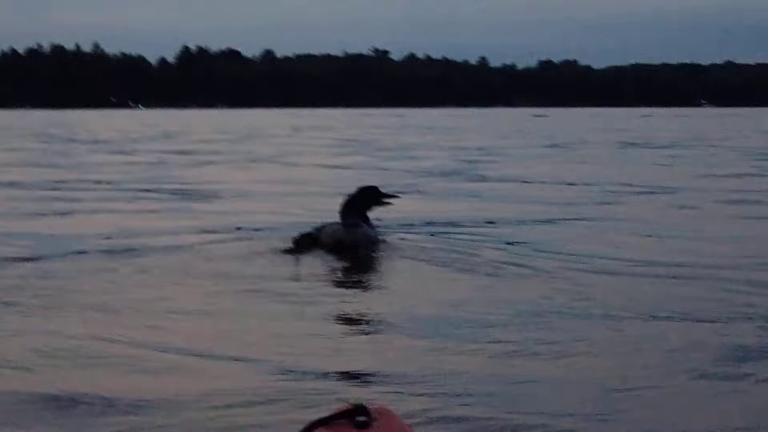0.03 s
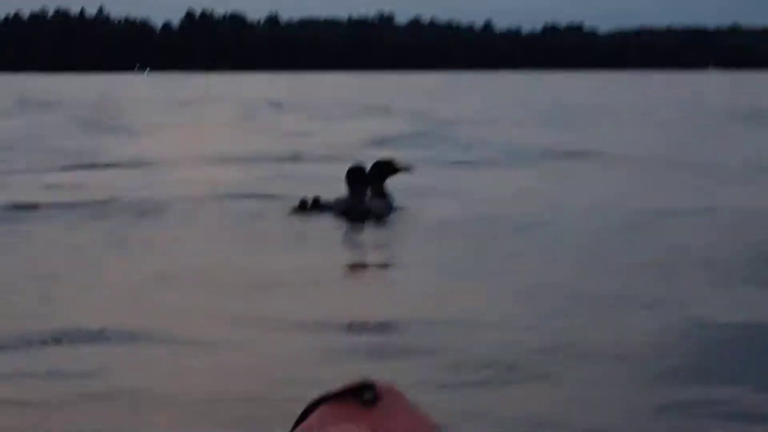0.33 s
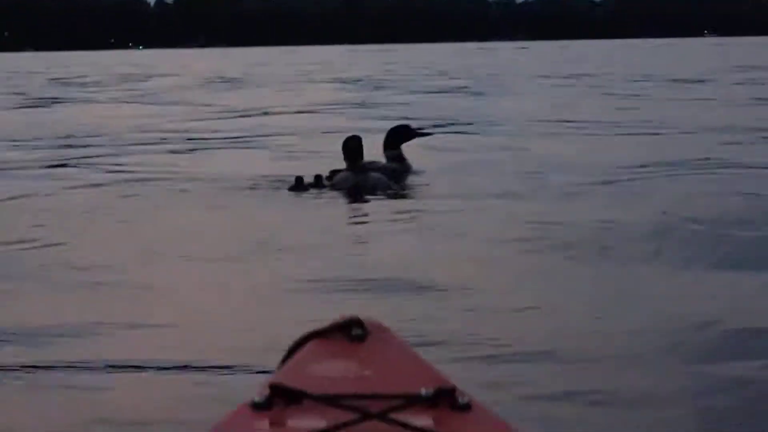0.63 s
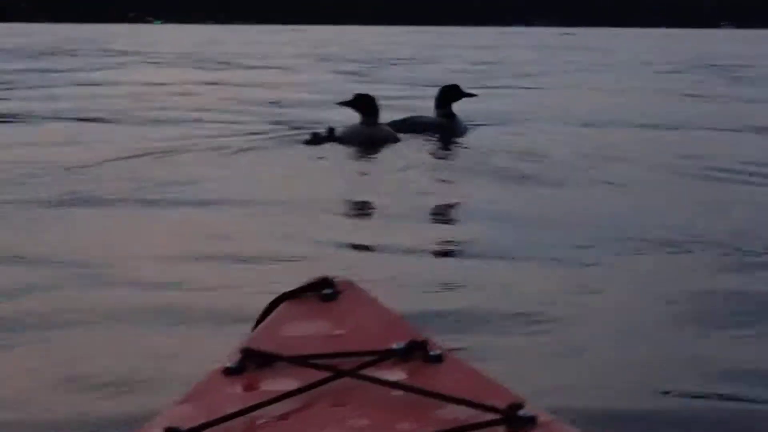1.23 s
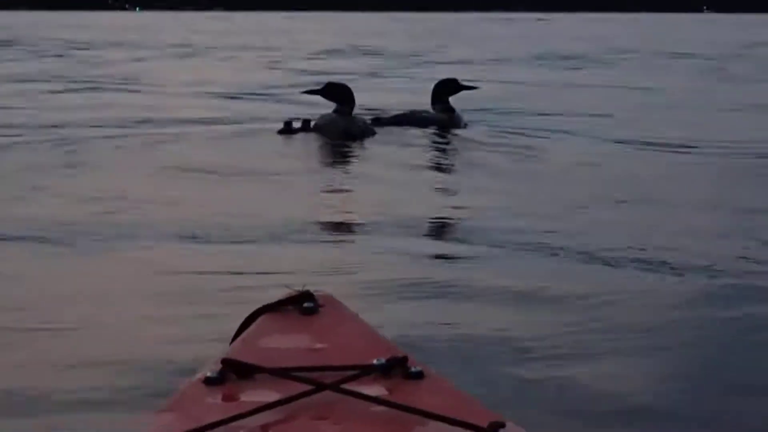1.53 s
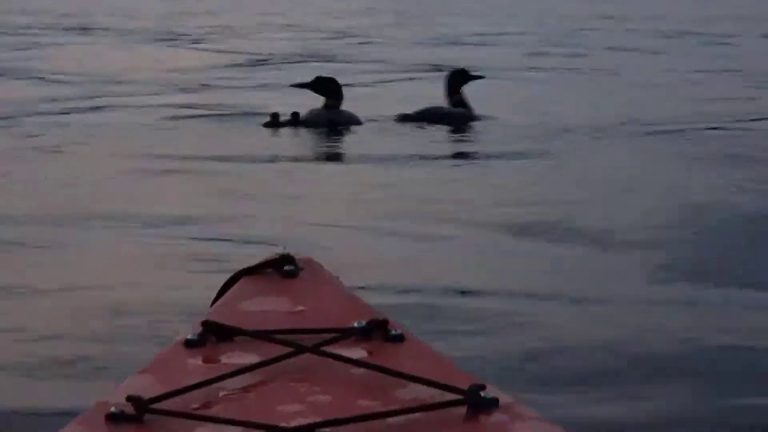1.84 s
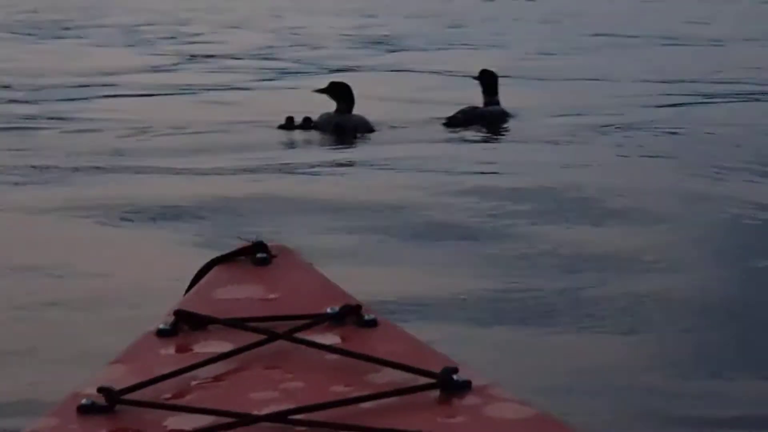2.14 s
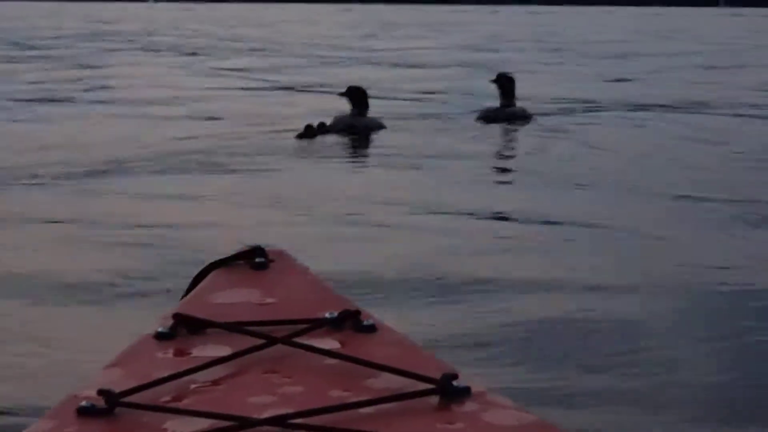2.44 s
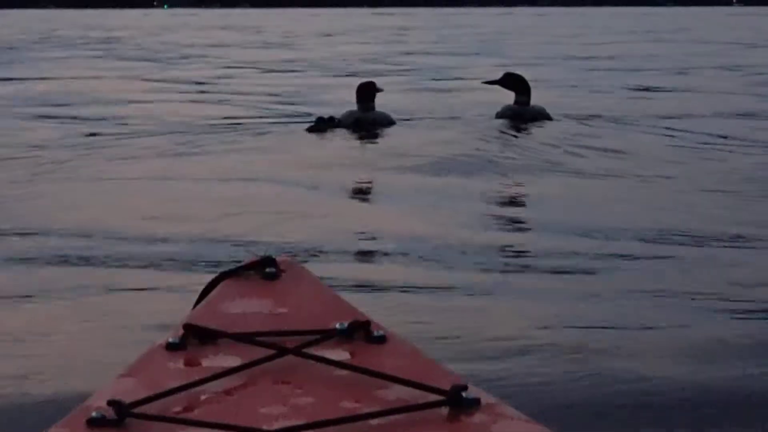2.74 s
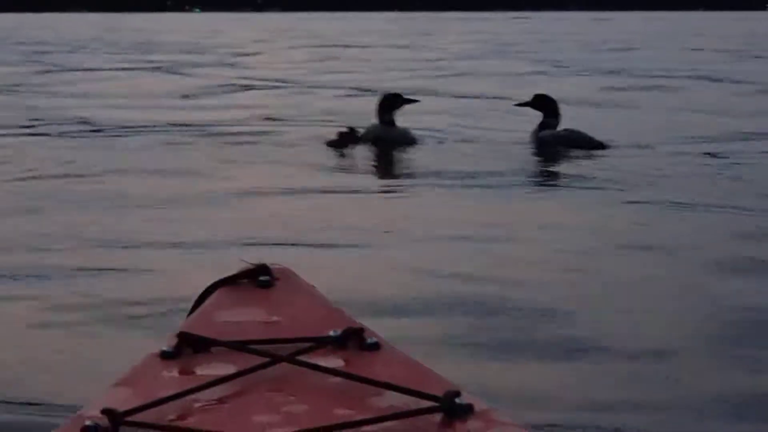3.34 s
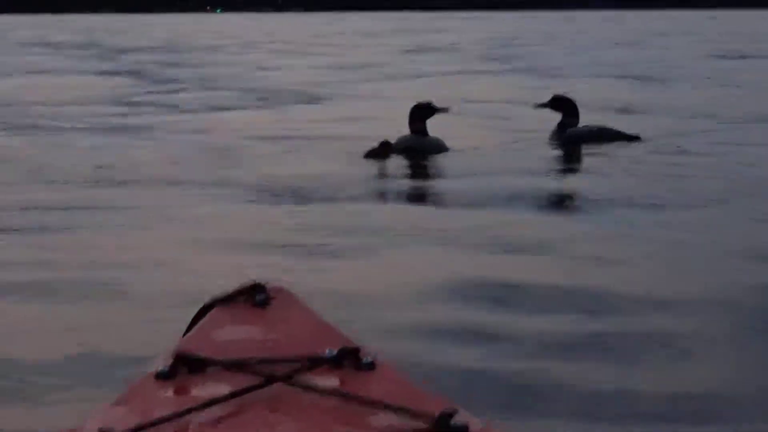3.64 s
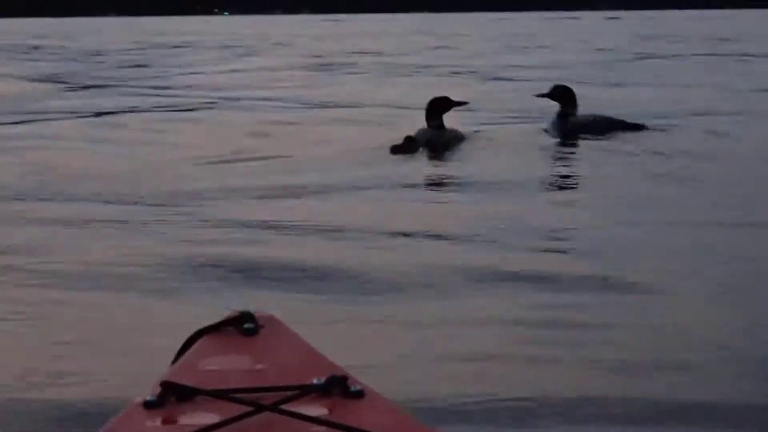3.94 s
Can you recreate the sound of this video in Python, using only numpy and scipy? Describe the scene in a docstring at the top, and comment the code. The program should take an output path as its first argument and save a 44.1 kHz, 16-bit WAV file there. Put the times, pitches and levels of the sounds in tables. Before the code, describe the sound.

A faint, even wash of open air and hiss, dotted with small taps on a kayak.

```python
"""Kayak on a lake at dusk

The microphone opens with two soft pops onto a distant wash, a faint drone and its own hiss.
Clusters of small contacts bump the drifting hull, and two quick knocks ring the deck.
The hand-held camera ticks; something in it, probably the lens motor, whines faintly in short steps."""
import sys
import numpy as np
from scipy import signal
from scipy.fft import rfft, irfft
from scipy.io import wavfile
from scipy.ndimage import uniform_filter1d

SR = 44100
rng = np.random.default_rng(int(sys.argv[2]) if len(sys.argv) > 2 else 0)


def generate_wav(sig):
    """Save sig (samples, or channels by samples) to the path in sys.argv[1] as 16-bit PCM at SR."""
    pcm = np.round(np.clip(np.atleast_2d(sig).T, -1, 1) * 32767).astype(np.int16)
    wavfile.write(sys.argv[1], SR, pcm)


N = 176400


def from_db(db):
    """Decibels to gain."""
    return 10 ** (np.asarray(db) / 20)


def unit_rms(x):
    """Scale to unit power."""
    return x / np.sqrt(np.mean(x ** 2) + 1e-20)


def clock():
    """Sample times [s]."""
    return np.arange(N) / SR


def pan(db):
    """Stereo gains for a left-minus-right level."""
    return from_db(np.array([[db], [-db]]) / 2)


def colour(points):
    """Gain per FFT bin from (frequency [Hz], level [dB]) points."""
    hz, db = np.transpose(points)
    bin_hz = np.arange(N // 2 + 1) * SR / N
    return from_db(np.interp(np.log(bin_hz + 1e-9), np.log(hz), db))


def noise(gains):
    """White noise shaped by a gain per FFT bin."""
    return irfft(rfft(rng.standard_normal(N)) * gains, N)


def stereo_noise(points):
    """Independent left and right noise, unit RMS."""
    return unit_rms(np.array([noise(colour(points)) for _ in range(2)]))


def drift(corner_hz):
    """Slow random motion, unit RMS."""
    bin_hz = np.arange(N // 2 + 1) * SR / N
    return unit_rms(noise(1 / (1 + (bin_hz / corner_hz) ** 2)))


def click(at_s):
    """Unit impulse."""
    return 1.0 * (np.arange(N) == int(at_s * SR))


def butter(x, order, hz, kind="low"):
    """Butterworth filter."""
    return signal.sosfilt(signal.butter(order, hz, kind, fs=SR, output="sos"), x + 1e-18)


def ring(force, hz, t60_s):
    """One mode: each impulse starts a decaying sine."""
    radius, angle = from_db(-60 / (t60_s * SR)), 2 * np.pi * hz / SR
    return signal.lfilter([0, np.sin(angle)], [1, -2 * radius * np.cos(angle), radius ** 2], force + 1e-18)


def strike(force, modes):
    """A force rings a body's modes, alternating in sign."""
    return sum((-1) ** k * from_db(db) * ring(force, hz, t60_s) for k, (hz, db, t60_s) in enumerate(modes))


def wash():
    """Soft, fluttering noise from the far shore, nearly the same in both ears."""
    # (frequency [Hz], relative density [dB])
    spectrum = [(20, -45), (40, -13.5), (70, -11.5), (105, -5), (140, -4), (200, -2), (260, 5), (350, -2),
                (600, -2), (1000, -7), (1400, -12.5), (1780, -16), (1890, -22.5), (2070, -17),
                (2600, -31.5), (3200, -28), (3450, -35), (3650, -26.5), (3950, -39.5), (4300, -31),
                (5050, -17.5), (5900, -27), (9000, -39.5)]
    # (frequency [Hz], side re mid [dB])
    width = [(25, 4), (60, -5.5), (130, -19), (280, -17), (600, -16.5), (1400, -10), (2600, -8.5),
             (4000, -31), (5000, -21)]
    # (time [s], level [dB])
    levels = [(.25, -45), (.6, -45), (1.3, -44.5), (2.05, -45.5), (2.7, -44.5), (3.0, -44), (3.65, -42.5),
              (4, -44.5)]
    mid = noise(colour(spectrum))
    side = noise(colour(spectrum) * colour(width))
    flutter_db = .89 * drift(corner_hz=7.2)
    level_db = np.interp(clock(), *np.transpose(levels)) + flutter_db
    return from_db(level_db) * unit_rms(np.array([mid + side, mid - side]))


def far_tone(hz):
    """A tone that wanders and wavers on its way over the water."""
    wander_hz = 2 * drift(corner_hz=7.6)
    waver_db = 1.5 * drift(corner_hz=5.4)
    phase = 2 * np.pi * np.cumsum(hz + wander_hz) / SR
    return unit_rms(np.sin(phase) * from_db(waver_db))


def drone():
    """Steady far tones, plus whines that swell and fade, perhaps from a road."""
    # (frequency [Hz], level [dB])
    tones = [(96, -60), (261, -53.5), (481, -64), (558, -63.5), (1811, -70)]
    # (peak time [s], 1/e half-width [s], frequency [Hz], glide [Hz/s], level [dB])
    swells = [(3.47, .45, 315, 42, -45), (3.14, .17, 481, 0, -49.5), (3.63, .18, 557, 0, -45.5),
              (3.69, .045, 908, 0, -52.5)]
    out = sum(from_db(db) * far_tone(hz) for hz, db in tones)
    for peak_s, half_s, hz, glide_hz_per_s, db in swells:
        offset_s = clock() - peak_s
        envelope = np.exp(-(offset_s / half_s) ** 2)
        out += from_db(db) * envelope * far_tone(hz + glide_hz_per_s * offset_s)
    return out


def air():
    """Faint rumble of moving air, separate at each microphone port."""
    # (frequency [Hz], relative density [dB])
    spectrum = [(15, 0), (35, -10), (70, -2), (130, -2), (300, -10), (1000, -46)]
    return from_db(-67.5) * stereo_noise(spectrum)


def hiss():
    """Each microphone's steady self-noise."""
    # (frequency [Hz], relative density [dB])
    spectrum = [(2000, -32), (3100, -5.5), (3500, -31), (4200, -31), (4600, -2.5), (5200, -1), (6000, -1.5),
                (6900, -2.5), (8050, 3.5), (9200, -4.5), (11500, -5.5), (16000, -7.5)]
    return from_db(-53.5) * pan(1.8) * stereo_noise(spectrum)


def pops():
    """Two switch-on voltage steps, each swinging back through the microphone's bass cut."""
    # (time [s], level before filtering [dB])
    steps = [(0.2394, -24), (0.2496, -25)]
    rise_s, fall_s = .00041, .0023
    voltage = 0
    for at_s, db in steps:
        age_s = np.maximum(clock() - at_s, 0)
        voltage -= from_db(db) * np.minimum(age_s / rise_s, 1) * np.exp(-age_s / fall_s)
    return butter(voltage, order=2, hz=[53, 1600], kind="band")


def lens_motor():
    """Ticking steps on a steady clock: a high whine in the listed runs, mostly a low one between."""
    # (start [s], length [steps])
    high_runs = [(1.073, 1), (1.173, 2), (1.373, 1), (1.473, 1), (1.64, 2), (1.84, 2), (2.04, 2),
                 (2.173, 1), (2.34, 1), (2.44, 2), (2.64, 1), (2.74, 1), (2.84, 2), (3.04, 1), (3.207, 1),
                 (3.44, 2), (3.573, 2), (3.74, 1), (3.907, 1)]
    steps_per_s, first_s, whine_s = 30, .0065, .027
    high_hz, high_db, high_edge_s = 6150, -51.5, .003
    low_hz, low_db, low_edge_s = 4753, -52, .012
    low_share, spread_hz = .7, 12
    step, age_s = np.divmod(clock() - first_s + 1 / steps_per_s, 1 / steps_per_s)
    step = step.astype(int)
    chance, strength, detune, start_cycles = rng.random((step[-1] + 1, 4))[step].T
    high_steps = [round((at_s - first_s) * steps_per_s) + 1 + k
                  for at_s, count in high_runs for k in range(int(count))]
    is_high = np.isin(step, high_steps)
    is_low = ~is_high & (chance < low_share)
    to_edge_s = np.minimum(age_s, whine_s - age_s)
    cycles = start_cycles + spread_hz * (2 * detune - 1) * age_s
    cycles = cycles + np.array([[0], [.25]])   # right leads by 90 degrees

    def whine(hz, db, edge_s):
        envelope = np.clip(to_edge_s / edge_s, 0, 1)
        return from_db(db) * envelope * np.sin(2 * np.pi * (hz * age_s + cycles))

    high = is_high * whine(high_hz, high_db, high_edge_s)
    low = is_low * whine(low_hz, low_db, low_edge_s)
    kicks = np.diff(step, prepend=0) * (.5 + strength) * np.sign(start_cycles - .5)
    return high + low + from_db(-57) * ring(kicks, hz=3127, t60_s=.016)


def hull_bumps():
    """Each bump is a short cluster of contacts through one broad hull resonance."""
    # (time [s], level [dB], centre [Hz], width [octaves], length [s])
    bumps = [(.508, -35, 247, 0.28, 0.034), (.509, -37.5, 405, 0.3, 0.03), (0.567, -41, 256, .7, 0.011),
             (.627, -40, 1130, 0.56, 0.012), (0.629, -43, 336, 0.98, 0.024),
             (0.666, -48, 1200, 0.64, 0.019), (0.904, -38, 820, 0.67, 0.026), (0.92, -40, 330, 1.73, 0.012),
             (2.942, -43, 293, 0.71, .03), (3.343, -41.5, 1360, .75, 0.015),
             (3.368, -47.5, 1540, 0.43, 0.014)]
    attack_s, release_s, contacts_per_s = .0015, .0076, 900
    out = 0
    for at_s, db, centre_hz, octaves, length_s in bumps:
        age_s = clock() - at_s
        envelope = np.clip(age_s / attack_s, 0, 1) * np.exp(-np.maximum(age_s - length_s, 0) / release_s)
        contacts = (rng.random(N) < contacts_per_s / SR) * rng.choice([-1, 1], N)
        edges_hz = centre_hz * 2 ** (np.array([-.5, .5]) * octaves)
        hull = butter(contacts, order=4, hz=edges_hz, kind="band")
        running_rms = np.sqrt(uniform_filter1d(hull ** 2, size=600) + 1e-12)
        bump = envelope * hull / running_rms
        out += from_db(db) * bump * np.sqrt(np.sum(envelope ** 2) / np.sum(bump ** 2))
    return out


def camera_ticks():
    """A snap and a brief rattle ring the camera body."""
    # (time [s], force [dB], pan [dB], rattle decay [s], rattle re snap [dB], low-pass [Hz])
    ticks = [(.6328, -23, 0.5, 0.0071, -12, 5450), (.8685, -34.5, 1, 0.013, -6.5, 7400),
             (1.461, -31.5, 1, .002, -9, 8500), (1.7092, -37, 1, .002, -13, 7000),
             (3.352, -45, 3, 0.015, -1.5, 8000), (3.3772, -36.5, 1, .003, -10, 6500),
             (3.404, -31.5, 12, 0.00091, -22, 10000), (3.8731, -28.5, 5, .002, -27, 10000)]
    # (frequency [Hz], gain [dB], t60 [s])
    body_modes = [(5180, -1, 0.0046), (6000, -4.5, 0.0034), (6560, 0.5, 0.0016), (8130, -6.5, 0.0036)]
    rattle_density, highpass_hz = .12, 4750
    out = 0
    for at_s, db, pan_db, rattle_s, rattle_db, lowpass_hz in ticks:
        age_s = clock() - at_s
        grains = rng.standard_normal(N) * (rng.random(N) < rattle_density)
        rattle = (age_s > 0) * np.exp(-np.abs(age_s) / rattle_s) * grains
        force = butter(click(at_s) + from_db(rattle_db) * rattle, order=5, hz=lowpass_hz)
        out += from_db(db) * pan(pan_db) * strike(force, body_modes)
    return signal.sosfilt(signal.cheby1(8, .5, highpass_hz, "high", fs=SR, output="sos"), out)


def deck_knocks():
    """Single blows on the plastic deck; softer contact, duller sound."""
    # (time [s], force [dB], contact low-pass [Hz])
    knocks = [(1.5927, -25, 2500), (1.605, -32, 600)]
    # (frequency [Hz], gain [dB], t60 [s])
    deck_modes = [(279, -6, 0.081), (570, -0.5, 0.013), (840, -1.5, 0.019), (1290, -7, 0.01)]
    force = sum(from_db(db) * butter(click(at_s), order=1, hz=hz) for at_s, db, hz in knocks)
    return strike(force, deck_modes)


def scene():
    """Silence, then the microphone pops open and its gain settles upward."""
    open_s, settle_s, start_gain = .238, .084, .28
    age_s = clock() - open_s
    gain = (age_s > 0) * (1 - (1 - start_gain) * np.exp(-np.abs(age_s) / settle_s))
    leaning_left = pan(2) * (wash() + drone() + hull_bumps() + deck_knocks() + lens_motor())
    return gain * (leaning_left + camera_ticks() + air() + hiss()) + pops()


def record(dry):
    """Steep treble cut."""
    cutoff_hz = 15900
    return signal.sosfilt(signal.ellip(12, .1, 80, cutoff_hz, fs=SR, output="sos"), dry)


dry = scene()
out = record(dry)
generate_wav(out)
```